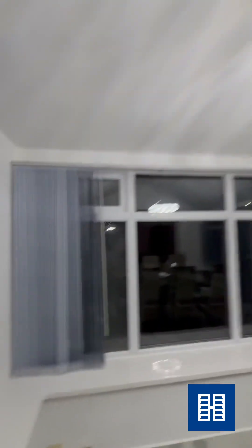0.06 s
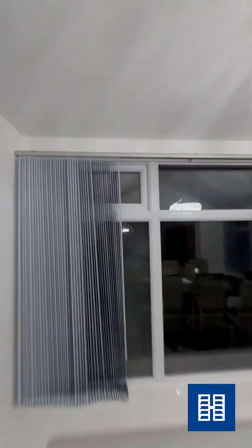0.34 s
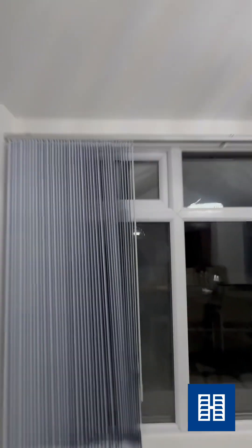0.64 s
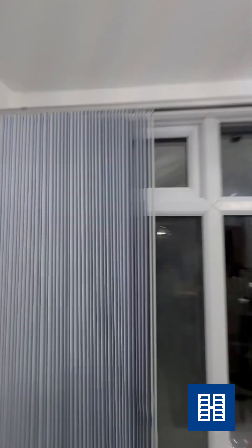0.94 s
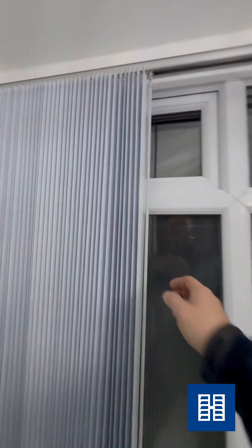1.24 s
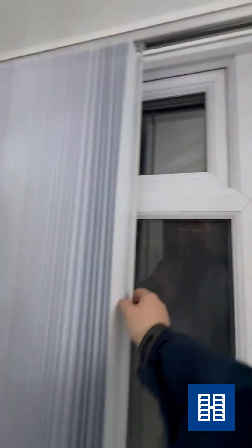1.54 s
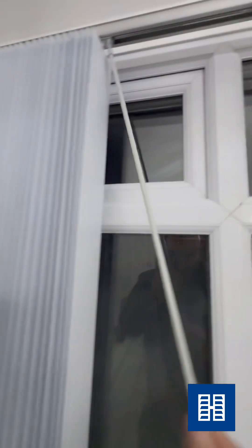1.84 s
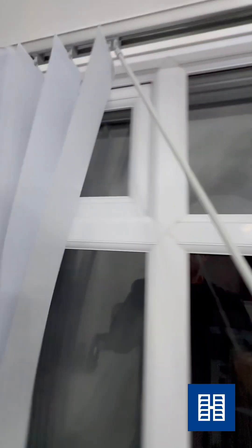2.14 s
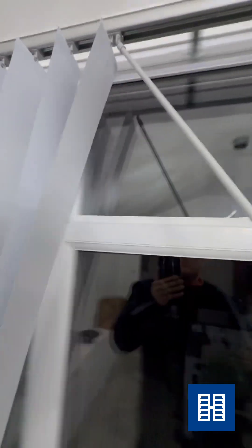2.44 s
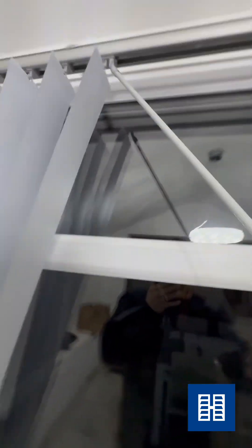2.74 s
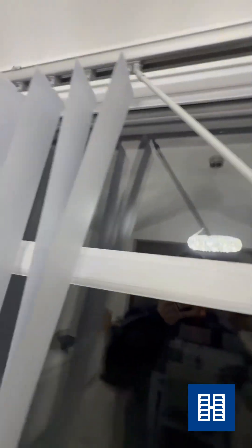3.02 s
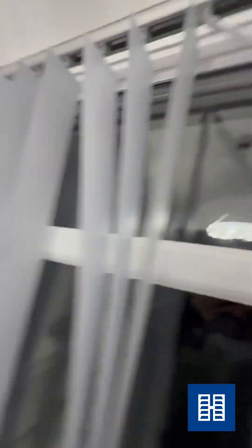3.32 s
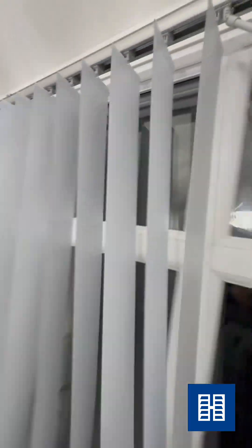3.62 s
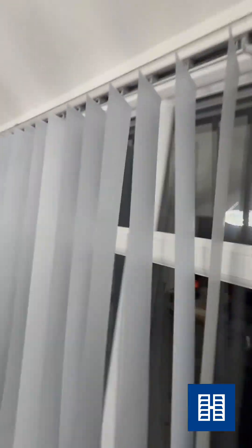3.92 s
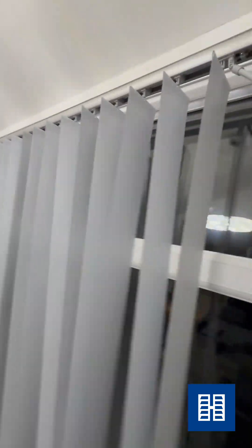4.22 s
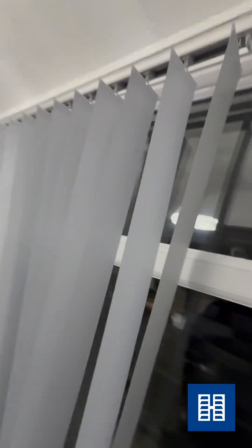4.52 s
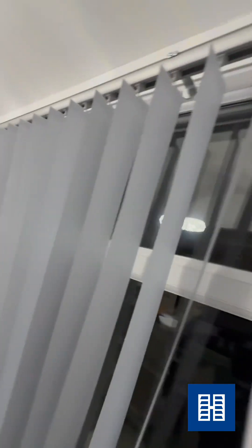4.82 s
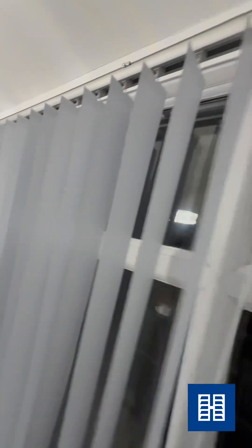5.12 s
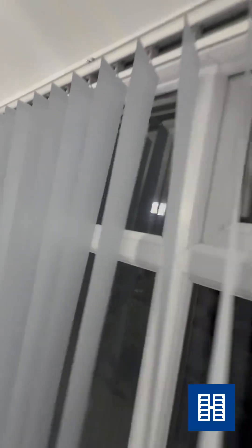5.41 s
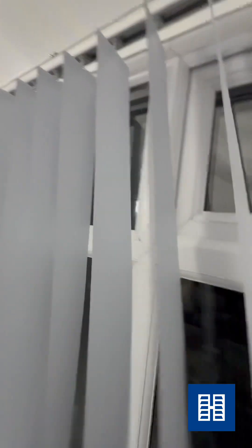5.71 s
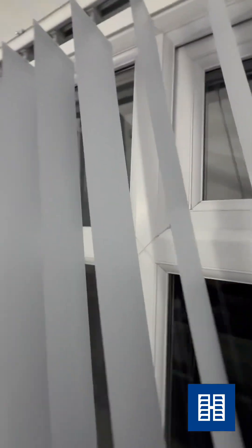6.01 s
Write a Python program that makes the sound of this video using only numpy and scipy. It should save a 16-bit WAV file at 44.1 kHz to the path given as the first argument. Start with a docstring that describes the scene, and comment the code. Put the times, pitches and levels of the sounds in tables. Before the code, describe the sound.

Footsteps approach, then a vertical blind is drawn, its plastic carriers hissing and clicking along a metal rail before the slats clack together.

```python
"""Over the low rumble of a bare room, someone walks up to a window: soles scuff, a jacket rustles and
one heavy step rings hollow. At two seconds they draw a vertical blind by its wand. Plastic carriers hiss
and judder along the metal headrail, clicking as spacers pick them up one by one; just after four seconds
one snaps hard. Dull knocks follow and a footfall sets the floor booming. Near six seconds the blind
stops, the swinging slats clack together and the jacket rustles once more."""
import sys
import numpy as np
from scipy import signal
from scipy.fft import rfft, irfft, next_fast_len
from scipy.io import wavfile

SR = 44100
rng = np.random.default_rng(int(sys.argv[2]) if len(sys.argv) > 2 else 0)


def put_to_file(sound):
    """Save the sound as 16-bit audio at rate SR, in the file named by the first command-line argument."""
    columns = np.atleast_2d(sound).T  # one column per channel
    safe = np.clip(columns, -1, 1)
    whole_steps = np.round(safe * 32767)
    wavfile.write(sys.argv[1], SR, whole_steps.astype(np.int16))


N = 271656
TIME = np.arange(N) / SR
ROOM_T60_S, TREBLE_T60_S = 0.35, 0.063
SETTLE_S = (5.795, 0.072, 0.097)  # start, rise and fall of the slats' swing after the stop

# Spacers pick up the carriers, the hardest with a rebound. Each row: start in seconds,
# tick, clack and thud levels in dB, ring pitch in Hz, ring level in dB.
PICKUPS = [(2.062, -27, -23, -53, 2850, -38), (2.0727, -17, -19.5, -50, 3990, -26.5),
           (2.145, -11, -20.5, -37.5, 2215, -31), (2.15, -47, -37, -48, 4100, -29),
           (2.2497, -40, -27.5, -35.5, 1940, -29), (2.3427, -37, -23.5, -39.5, 3660, -35),
           (2.4235, -31, -23, -37.5, 3520, -26), (2.499, -38, -21, -40.5, 3600, -34),
           (2.604, -39, -24.5, -48, 4150, -34), (2.7024, -19, -23, -54, 3530, -32),
           (2.7785, -20, -19, -43.5, 2350, -24), (2.8212, -36, -27, -55, 1860, -31),
           (2.8603, -19, -24, -43, 2486, -22.5), (2.991, -38, -30, -36, 1730, -34),
           (3.093, -20, -39, -36.5, 1710, -33), (3.18, -27, -23, -41, 1960, -36),
           (3.278, -17, -23, -58, 3770, -35), (3.519, -52, -46, -42, 1980, -48),
           (3.65, -34, -33, -39, 1920, -28), (3.752, -13, -23, -38.5, 2050, -35),
           (3.843, -42, -35, -35.5, 2000, -48), (4.1369, -13, -20, -62, 3050, -37),
           (4.142, -19, -28, -54, 3040, -25), (4.148, -32, -22.5, -56, 3240, -29),
           (4.343, -34, -21, -60, 2010, -44), (4.762, -16, -42, -70, 2940, -50),
           (5.238, -34, -33, -37, 3410, -23), (5.2406, -38, -23, -48, 2840, -20)]


def from_db(db):
    """Decibels to gain."""
    return 10 ** (np.asarray(db) / 20)


def rms_one(x):
    """Scale to rms 1."""
    return x / np.sqrt(np.mean(x ** 2) + 1e-20)


def level(rows):
    """A fader ride from a dB curve; it holds its first value and dies away after the last."""
    s, db = np.transpose(rows)
    return from_db(np.interp(TIME, s, db) - 200 * np.maximum(TIME - s[-1], 0))


def burst(start, fall_s, rise_s=0.0004):
    """Envelope of a contact: it builds quickly, then dies away."""
    age = TIME - start
    return np.clip(age / rise_s + .5, 0, 1) * np.exp(-np.clip(age / fall_s, 0, 40))


def stroke(start, rise_s, fall_s):
    """Envelope of a rub: it swells to 1, then dies away."""
    age = TIME - start
    return np.clip(age / rise_s, 0, 1) * np.exp(-np.clip((age - rise_s) / fall_s, 0, 40))


def drift(per_s):
    """A random wander of rms 1 that turns about per_s times a second."""
    knots = rng.standard_normal(N // 10)
    return rms_one(np.interp(TIME * per_s, np.arange(len(knots)), knots))


def chatter():
    """Even, full-band contact noise of rms 1."""
    return rng.choice([-1., 1.], N)


def cut(x, order, hz, kind="low"):
    """Butterworth filter, low-pass by default."""
    return signal.sosfilt(signal.butter(order, hz, kind, fs=SR, output="sos"), x)


def at_hz(points, hz):
    """Read an EQ curve on a log-frequency axis."""
    points = np.array(points)
    return np.interp(np.log(hz + 1), np.log(points[:, 0]), points[:, 1])


def colour(x, eq, size=4096):
    """Minimum-phase EQ that keeps the power of white noise."""
    gain = from_db(at_hz(eq, np.fft.rfftfreq(size, 1 / SR)))
    cepstrum = irfft(np.log(gain))
    cepstrum[1:size // 2] *= 2
    cepstrum[size // 2 + 1:] = 0
    response = irfft(np.exp(rfft(cepstrum)))
    return signal.oaconvolve(x, response[None] / np.linalg.norm(response), axes=1)[:, :N]


def resonate(x, hz, width_hz):
    """One resonance, gain 1 at its peak."""
    return signal.lfilter(*signal.iirpeak(hz, hz / width_hz, fs=SR), x + 1e-18)


def ringing(x, rings):
    """A body adds its resonances to what drives it."""
    return x + sum(from_db(db) * resonate(x, hz, width_hz) for hz, width_hz, db in rings)


def direct(x, lag_s=2.7e-5):
    """Direct sound arrives on the left a moment after the right."""
    size = next_fast_len(N + 64)
    delay = np.exp(-2j * np.pi * np.fft.rfftfreq(size, 1 / SR) * lag_s)
    return np.array([irfft(rfft(x, size) * delay, size)[:N], x])


def room(x, wet_db, split_hz=4000, build_s=0.0082):
    """Direct sound and a diffuse stereo tail whose treble dies sooner."""
    age = TIME[:SR * 3 // 4]
    white = rng.standard_normal((2, len(age)))
    low = cut(white, 1, split_hz)
    tail = low * from_db(-60 * age / ROOM_T60_S) + (white - low) * from_db(-60 * age / TREBLE_T60_S)
    tail *= np.minimum(age / build_s, 1)
    tail /= np.linalg.norm(tail[0])
    return direct(x) + from_db(wet_db) * signal.oaconvolve(x[None], tail, axes=1)[:, :N]


def reflect(x, scatter_db=-5.5, fall_s=0.0051, count=3):
    """Slats and glass scatter the sound in short echo patterns that shift with movement."""
    age = TIME[:SR // 16]
    decay = np.exp(-age / fall_s) - np.exp(-2 * age / fall_s)
    shares = np.array([drift(per_s=2.605) for _ in range(count)])
    out = x.copy()
    for share in shares / np.linalg.norm(shares, axis=0):
        echoes = rng.standard_normal(len(age)) * decay
        echoes /= np.linalg.norm(echoes)
        out += from_db(scatter_db) * share * signal.oaconvolve(x, echoes[None], axes=1)[:, :N]
    return out * np.std(x) / np.std(out)


def rubbing(gain, per_s, spread_db, wet_db):
    """Friction: tiny stick-slip releases of uneven size, plus their diffuse wash from the walls."""
    sizes = from_db(spread_db * np.minimum(rng.exponential(1, N), 4)) * rng.choice([-1, 1], N)
    slips = rms_one(sizes * (rng.random(N) < per_s / SR))
    fade = from_db(-120 / (TREBLE_T60_S * SR))  # share of power left after each sample
    wash_gain = np.sqrt(signal.lfilter([1 - fade], [1, -fade], gain ** 2))
    wash = from_db(wet_db) * wash_gain * rng.standard_normal((2, N))
    return (direct(gain * slips) + wash) / np.sqrt(1 + from_db(wet_db) ** 2 / 2)


def room_tone(air_db=-53, mode_hz=52.3, width_hz=3):
    """Still air rumbles softly under the drone of the room's lowest mode."""
    # Tone of the air. Each row: frequency in Hz, relative level in dB.
    air_eq = [(20, -39), (38, -13), (54, 0.5), (80, 5), (130, -7.5), (300, -5), (600, -13), (1400, -18),
              (3000, -16.5), (10000, -33), (16000, -29)]
    # Fader ride of the drone. Each row: time in seconds, level in dB.
    drone_ride = [(0.5, -57), (0.8, -69), (6.2, -59)]
    air = from_db(air_db) * colour(rng.standard_normal((2, N)), air_eq)
    drone = resonate(resonate(chatter(), mode_hz, width_hz), mode_hz, width_hz)
    return air + level(drone_ride) * rms_one(drone)


def swishes():
    """Brief rubs of sleeve and slat edges, each swelling and fading inside one resonance."""
    # Each row: start and length in seconds, pitch and bandwidth in Hz, dry level in dB.
    rubs = [(0.305, 0.19, 3050, 1100, -66), (0.53, 0.078, 3070, 1100, -65), (1.14, 0.081, 5900, 700, -60.5),
            (5.799, 0.069, 780, 110, -57)]
    out = np.zeros(N)
    for s, length_s, hz, width_hz, db in rubs:
        swell = np.sqrt(np.interp(TIME, [s, s + length_s / 3, s + length_s], [0, 1, 0]))
        out += from_db(db) * swell * rms_one(resonate(chatter(), hz, width_hz))
    return room(out, wet_db=11.0)


def rustles(trim_db=-1.5, rest_db=-62, slats_db=-43):
    """Jacket cloth rubs on itself, faintly even at rest, and the settling slats brush each other."""
    # Swings of the arm. Each row: start, rise and fall in seconds, relative level in dB.
    swings = [(0.0, 0.0012, 0.073, -52.5), (0.15, 0.039, 0.06, -55.5), (0.335, 0.028, 0.15, -49),
              (0.52, 0.04, 0.054, -51), (0.93, 0.055, 0.26, -55.5), (1.15, 0.0077, 0.27, -51),
              (1.48, 0.046, 0.41, -56), (1.55, 0.27, 0.4, -51), (5.93, 0.14, 0.65, -46.5)]
    # Tone of the cloth. Each row: frequency in Hz, relative level in dB.
    cloth_eq = [(300, -1), (900, 2.5), (1700, -3.5), (2700, 3), (4200, -2.5), (5800, 0.5), (7500, -1),
                (10000, 0.5), (15000, -54)]
    swing_power = sum((from_db(db) * stroke(s, rise_s, fall_s)) ** 2 for s, rise_s, fall_s, db in swings)
    jacket = np.sqrt(swing_power + from_db(rest_db) ** 2)
    slats = from_db(slats_db) * stroke(*SETTLE_S)
    rub = rubbing(np.hypot(jacket, slats), per_s=5000, spread_db=-18.0, wet_db=0.0)
    return reflect(from_db(trim_db) * colour(rub, cloth_eq))


def scuffs(trim_db=-5.5):
    """Soles drag across the floor and stir its resonances."""
    # Each row: start, rise and fall in seconds, relative level in dB, low-pass cutoff in Hz.
    drags = [(0.0, 0.0016, 0.23, -41.5, 380), (0.35, 0.063, 0.11, -47, 520), (0.57, 0.019, 0.17, -45, 420),
             (0.937, 0.044, 0.16, -36, 4000), (1.12, 0.1, 0.24, -49.5, 4000),
             (1.42, 0.0069, 0.014, -52, 2000), (1.5, 0.01, 0.06, -54, 2000)]
    # Tone of a sole. Each row: frequency in Hz, relative level in dB.
    sole_eq = [(50, 13.5), (150, -2), (210, -2), (290, 5), (520, 3), (800, 3), (1300, -4), (2500, -7.5),
               (5000, -21)]
    # The floor's resonances under it. Each row: pitch and bandwidth in Hz, gain in dB.
    floor_rings = [(215, 21, 9.5), (358, 40, 4), (464, 19, -9), (527, 22, 1), (575, 12, -3), (830, 100, -6)]
    rub = rubbing(np.ones(N), per_s=3400, spread_db=-1.0, wet_db=0.0)
    sole = ringing(colour(rub, sole_eq), floor_rings)
    return sum(from_db(db + trim_db) * stroke(s, rise_s, fall_s) * cut(sole, 2, cutoff_hz)
               for s, rise_s, fall_s, db, cutoff_hz in drags)


def hollow_step(start_s=0.92):
    """One heavy step lands softly and swells into a hollow ring in the floor."""
    # Each row: pitch in Hz, level in dB, rise and fall in seconds.
    modes = [(213, -42.5, 0.041, 0.089), (458, -46.5, 0.045, 0.068), (547, -46.5, 0.097, 0.064),
             (600, -44, 0.11, 0.069)]
    return direct(sum(from_db(db) * stroke(start_s, rise_s, fall_s) * np.sin(2 * np.pi * hz * TIME)
                      for hz, db, rise_s, fall_s in modes))


def floor_boom():
    """Footfalls leave the floor's low modes ringing."""
    # Each row: pitch in Hz, relative level in dB, seconds to fall by 60 dB.
    modes = [(80.8, -11, 2.35), (111.8, -9.5, 0.97), (249, -15.5, 2.4), (251, -8.5, 0.23),
             (477, -3.5, 0.32)]
    # Each row: start in seconds, strength in dB.
    footfalls = [(0.421, -52), (1.505, -51), (4.905, -44), (5.245, -28.5)]
    age = TIME[:SR]
    ring = sum(from_db(db - 60 * age / t60) * np.sin(2 * np.pi * hz * age) for hz, db, t60 in modes)
    hits = np.zeros(N)
    for s, db in footfalls:
        hits[round(s * SR)] = from_db(db)
    return signal.oaconvolve(hits, ring)[:N]


def knocks(thud_cutoff_hz=386, thud_fall_s=0.019):
    """Soft contacts, among them each slat's dull thud as it is picked up; every other knock has its own
    brightness."""
    # Knocks and rebounds of slats, wand and feet. Each row: start in seconds, relative level in dB,
    # low-pass cutoff in Hz, fall in seconds.
    hits = [(0.384, -38.5, 416, 0.026), (0.424, -34, 200, 0.02), (0.62, -46, 320, 0.028),
            (0.951, -44, 1100, 0.015), (1.424, -43.5, 520, 0.014), (1.502, -42.5, 520, 0.02),
            (1.592, -51, 500, 0.019), (4.081, -37.5, 900, 0.009), (4.336, -32, 900, 0.014),
            (4.431, -33, 756, 0.019), (4.5664, -17.5, 770, 0.0064), (4.577, -20, 537, 0.0033),
            (4.592, -26, 160, 0.024), (4.613, -28, 705, 0.009), (4.655, -32, 170, 0.015),
            (4.901, -28.5, 700, 0.021), (5.053, -34.5, 705, 0.019), (5.236, -44, 794, 0.016),
            (5.275, -33, 434, 0.0052), (5.363, -30.5, 770, 0.0061), (5.562, -33.5, 910, 0.013),
            (5.709, -32.5, 695, 0.016), (5.771, -42, 595, 0.0054), (5.878, -35, 780, 0.017),
            (5.9185, -31.5, 3200, 0.0052), (5.965, -44, 220, 0.016)]
    # Their shared tone. Each row: frequency in Hz, relative level in dB.
    knock_eq = [(40, -9), (120, -9.5), (200, -6.5), (330, -4.5), (520, -3.5), (800, -4), (2000, -3)]
    thuds = [(s, db, thud_cutoff_hz, thud_fall_s) for s, _, _, db, *_ in PICKUPS]
    grain, blows = chatter(), np.zeros(N)
    for s, db, cutoff_hz, fall_s in thuds + list(hits):
        makeup = np.sqrt(SR / 2 / cutoff_hz)  # restores the power the low-pass takes
        blows += from_db(db) * makeup * cut(grain * burst(s, fall_s), 3, cutoff_hz)
    return colour(room(blows, wet_db=-4.5), knock_eq)


def sliding(start_s=1.962, attack_s=0.04, join_s=0.014, jerk_fall_s=0.044):
    """Envelopes of hiss, rail ring and judder: one carrier leads, the rest join, pick-ups jerk them."""
    # The pull on the wand. Each row: time in seconds, friction level in dB.
    pull = [(2.19, -32.5), (2.24, -32.5), (2.47, -27), (2.58, -31), (2.77, -25.5), (2.99, -28.5),
            (3.3, -25.5), (3.46, -28.5), (4.29, -24), (4.81, -23.5), (5.03, -27), (5.29, -24),
            (5.58, -27.5), (5.65, -34), (5.8, -56.5)]
    # The carriers' judder in rail and frame. Each row: time in seconds, level in dB.
    judder_ride = [(2.05, -53), (2.28, -47.5), (3.41, -47.5), (4.25, -42.5), (4.6, -42), (5.19, -49.5),
                   (5.39, -43.5), (5.8, -53.5)]
    lead_hiss_db, lead_ring_db = -2.5, -9  # the lead carrier alone is quieter
    jerk_hiss_db, jerk_ring_db = -23, -14  # relative to each pick-up's clack
    ring_top_db, knee_db, settle_db = -34.5, -33.5, -46.5
    friction = level(pull) * np.clip((TIME - start_s) / attack_s, 0, 1) ** 2
    joined = np.clip((TIME - PICKUPS[0][0]) / join_s + .5, 0, 1)
    jerks = sum(from_db(clack_db) * burst(s, jerk_fall_s) for s, _, clack_db, *_ in PICKUPS)
    hiss = friction * from_db(lead_hiss_db * (1 - joined))
    drive = friction / np.hypot(friction, from_db(knee_db))  # levels off above the knee
    ring = drive * from_db(ring_top_db + lead_ring_db * (1 - joined))
    settling = from_db(settle_db) * stroke(*SETTLE_S)  # swinging slats shake the frame
    return (np.hypot(hiss, from_db(jerk_hiss_db) * jerks),
            np.hypot(ring, from_db(jerk_ring_db) * jerks),
            np.hypot(level(judder_ride) * joined, settling))


def shifting_modes(x, band_hz=(2100, 10400), count=30, width_hz=120, depth_db=2.3):
    """Travelling carriers favour now these, now those bending modes of the rail: rings come and go."""
    out = x.copy()
    for hz in np.geomspace(*band_hz, count):
        gain = from_db(depth_db * (drift(per_s=24) - .5))
        out += (gain - 1) * resonate(x, hz, width_hz)
    return out * np.std(x) / np.std(out)


def carriers(hiss_db=0.38, judder_db=-0.5):
    """Plastic slides on metal; one uneven grip shakes the hiss, the rail's ring and the frame."""
    # Tones of friction, headrail and window frame. Each row: frequency in Hz, relative level in dB.
    hiss_eq = [(1500, -45), (3000, -14), (4500, -12.5), (6000, -5.5), (7300, 2), (8000, 4), (8600, 5.5),
               (10200, 4.5), (11200, -1.5), (12000, -8), (13000, 1.5), (15500, -21)]
    rail_eq = [(800, -21.5), (1300, -16.5), (1550, -6), (1800, 0), (2200, -2), (2600, -4.5), (3400, -10),
               (4300, -11.5), (6000, -6), (10000, -34)]
    frame_eq = [(40, -18.5), (90, 4), (180, 2), (300, -1), (550, 0), (800, -2.5), (1200, -8), (2000, 1.5),
                (5000, -36)]
    # Resonances of headrail and frame. Each row: pitch and bandwidth in Hz, gain in dB.
    rail_rings = [(2430, 370, 14.5), (3510, 940, 5.5), (5970, 160, -3.5), (7400, 80, -8), (8100, 76, -1),
                  (9140, 170, -4.5), (9550, 82, -14), (9830, 160, -5.5), (10000, 73, -24)]
    frame_rings = [(264, 8.2, -2), (339, 6.7, -36), (496, 15, -6), (610, 14, -2), (773, 36, 3),
                   (1054, 66, -2)]
    hiss_flutter_db, ring_flutter_db, judder_flutter_db = 0.51, -0.17, 2.5
    friction, ring, judder = sliding()
    grip = drift(per_s=110)
    friction *= from_db(hiss_flutter_db * grip)
    hiss = colour(rubbing(friction, per_s=14000, spread_db=2.0, wet_db=-3.0), hiss_eq)
    ring *= from_db(ring_flutter_db * grip)
    rail = colour(rubbing(ring, per_s=1500, spread_db=2.0, wet_db=2.0), rail_eq)
    judder *= from_db(judder_flutter_db * (grip + drift(per_s=49)) / 2)
    frame = colour(rubbing(judder, per_s=900, spread_db=1.0, wet_db=7.5), frame_eq)
    scrape = shifting_modes(from_db(hiss_db) * ringing(hiss, rail_rings) + rail)
    shudder = from_db(judder_db) * ringing(frame, frame_rings)
    return reflect(scrape + shudder, scatter_db=-13.0, fall_s=0.008)


def clicks(tick_trim_db=-1.0, clack_trim_db=-3.5, rail_db=-8.0, rail_hz=1860, detune=0.035):
    """Plastic hits with a bright tick and a dry clack; a carrier also rings itself and the rail."""
    # The swinging slats collide. Each row: start in seconds, tick and clack levels in dB.
    slat_clacks = [(5.81, -35, -36), (5.835, -44, -43), (5.871, -29, -45), (5.878, -39, -37),
                   (5.921, -36, -40), (5.961, -39, -42)]
    # Tones of tick and clack. Each row: frequency in Hz, relative level in dB.
    tick_eq = [(1000, -62), (4000, -29), (7000, 12), (10000, 15.5), (13000, 7.5), (16000, -73)]
    clack_eq = [(300, -2.5), (1200, 0), (1800, 3), (2500, 0), (3400, 4.5), (4500, 4), (8000, 1),
                (16000, -100)]
    tick_fall_s, clack_fall_s, rail_fall_s, ring_fall_s = .003, .0045, .0027, .0065
    tick_gain, clack_gain, rings = np.zeros((3, N))
    for s, tick_db, clack_db, *_ in list(PICKUPS) + list(slat_clacks):
        tick_gain += from_db(tick_db) * burst(s, tick_fall_s)
        clack_gain += from_db(clack_db) * burst(s, clack_fall_s)
    age = TIME[:SR // 20]
    rail = from_db(rail_db) * np.sin(2 * np.pi * rail_hz * age) * np.exp(-age / rail_fall_s)
    for s, _, clack_db, _, hz, ring_db in PICKUPS:
        phase = 2 * np.pi * hz * age
        mode_pair = np.sin(phase * (1 - detune)) - .5 * np.sin(phase * (1 + detune))
        carrier = from_db(ring_db) * mode_pair * np.exp(-age / ring_fall_s)
        start = round(s * SR)
        rings[start:start + len(age)] += from_db(clack_db) * rail + carrier
    tick = colour(room(tick_gain * chatter(), wet_db=-5.0), tick_eq)
    clack = colour(room(clack_gain * chatter() + rings, wet_db=-5.0), clack_eq)
    return from_db(tick_trim_db) * tick + from_db(clack_trim_db) * clack


def snap(start_s=4.1378, drive_db=-1.5, fall_s=0.0014, band_hz=(6000, 12500)):
    """One carrier hits its spacer hard: a very short, bright crack."""
    crack = from_db(drive_db) * burst(start_s, fall_s) * chatter()
    return room(cut(crack, 2, band_hz, "band"), wet_db=-7.0)


def scene():
    """The blind and the walker's movements over the room tone."""
    background = room_tone()
    blind = carriers() + clicks() + snap()
    movement = knocks() + floor_boom() + hollow_step() + scuffs() + rustles() + swishes()
    return background + blind + movement


def record(dry, antiphase_hz=10710, centre_floor_db=-79, low_cut_hz=40, high_cut_hz=15700, ceiling=.72):
    """Narrow bass, wide top treble in opposite phase; then a low cut, clipped peaks and a high cut."""
    # Stereo width. Each row: frequency in Hz, side gain in dB.
    side_eq = [(60, -28), (250, -14.5), (700, -0.5), (1300, -3), (1850, -10), (2600, 5), (4100, 1),
               (4800, 5), (6500, 0), (8500, -1.5), (12000, 4)]
    size = next_fast_len(N + 4096)
    hz = np.fft.rfftfreq(size, 1 / SR)
    centre_gain = 1 / np.sqrt(1 + (hz / antiphase_hz) ** 130) + from_db(centre_floor_db)
    mid = rfft(dry[0] + dry[1], size) / 2 * centre_gain
    side = rfft(dry[0] - dry[1], size) / 2 * from_db(at_hz(side_eq, hz))
    stereo = irfft(np.array([mid + side, mid - side]), size)[:, :N]
    stereo = np.clip(cut(stereo, 4, low_cut_hz, "high"), -ceiling, ceiling)
    return signal.sosfilt(signal.ellip(12, .1, 90, high_cut_hz, fs=SR, output="sos"), stereo)


dry = scene()
out = record(dry)
put_to_file(out)
```